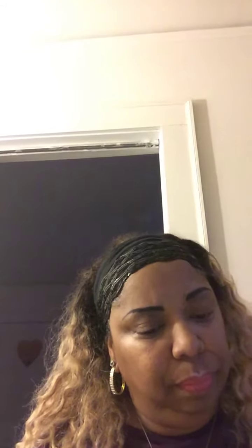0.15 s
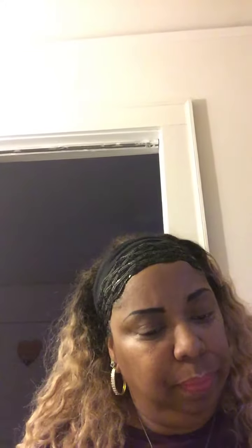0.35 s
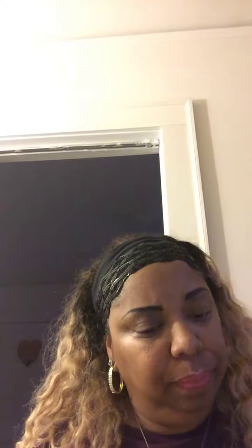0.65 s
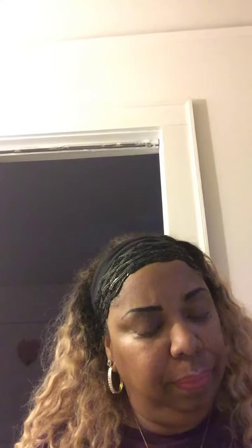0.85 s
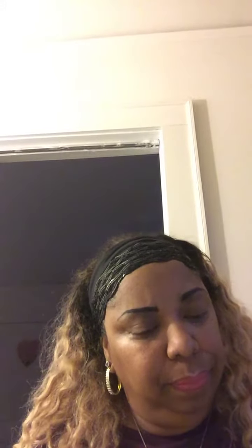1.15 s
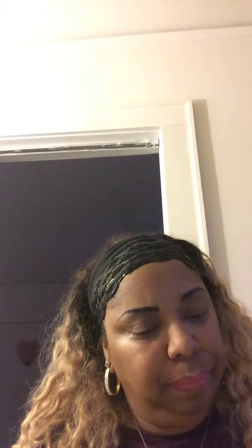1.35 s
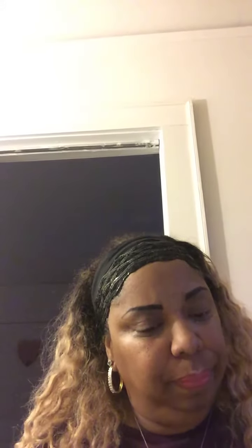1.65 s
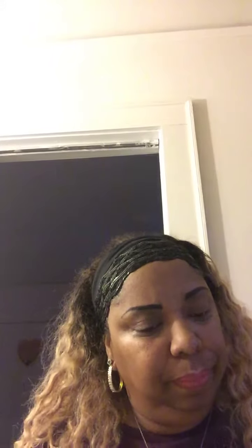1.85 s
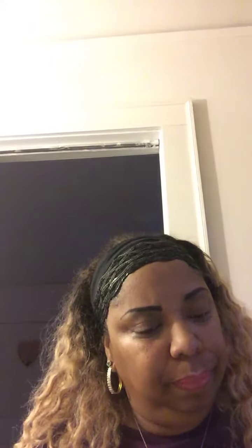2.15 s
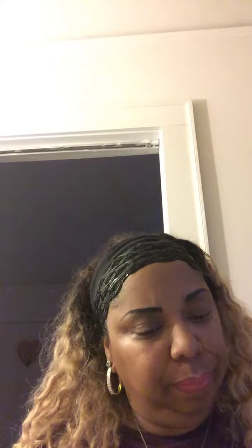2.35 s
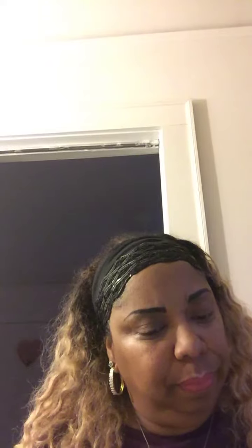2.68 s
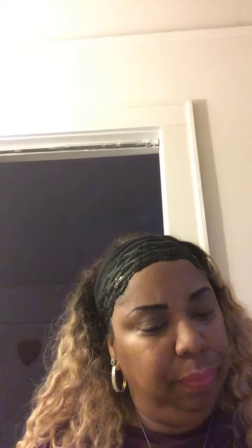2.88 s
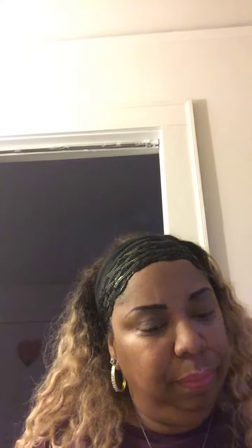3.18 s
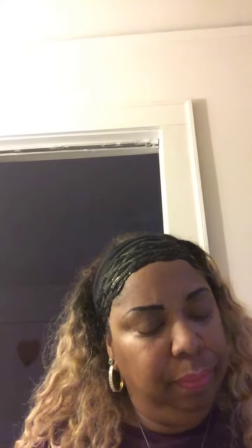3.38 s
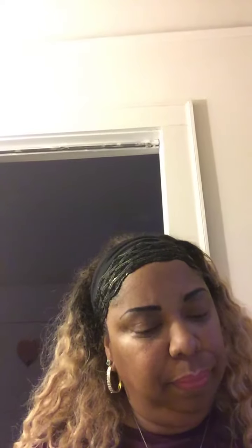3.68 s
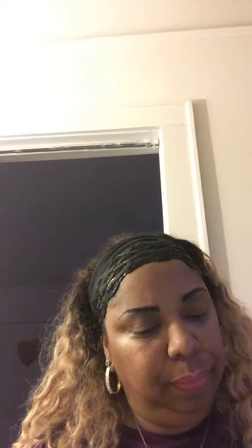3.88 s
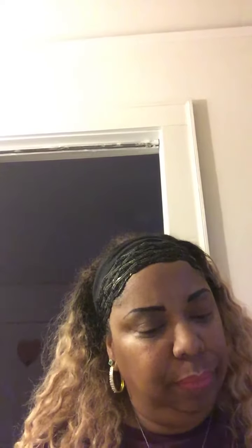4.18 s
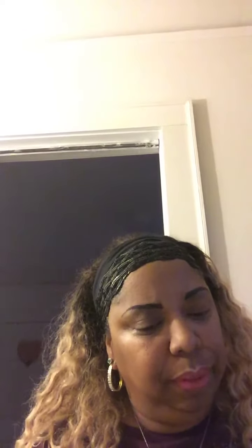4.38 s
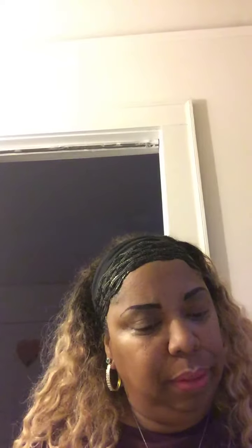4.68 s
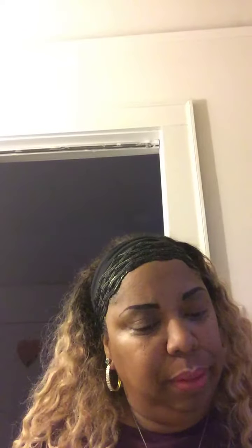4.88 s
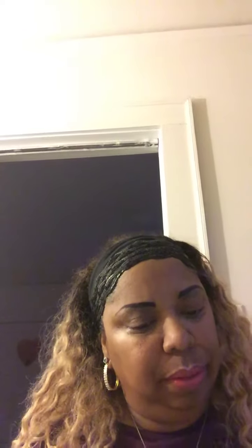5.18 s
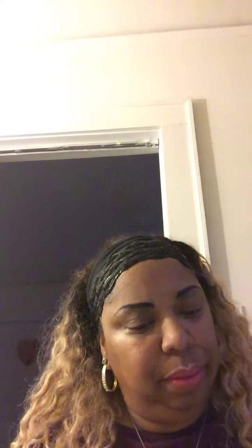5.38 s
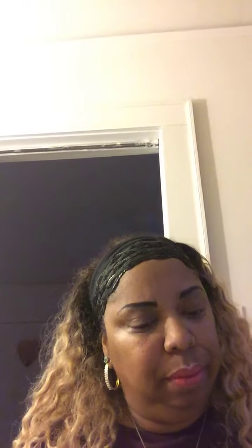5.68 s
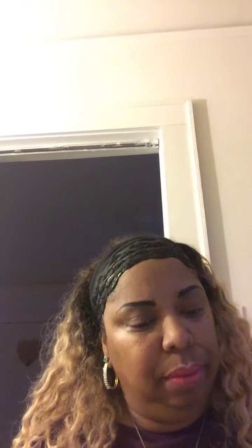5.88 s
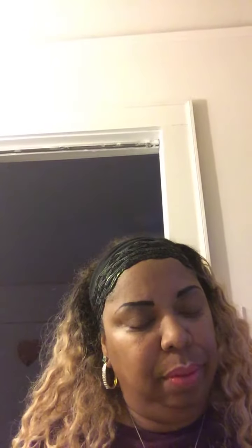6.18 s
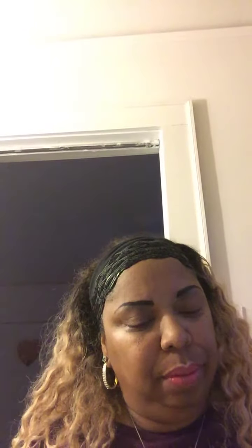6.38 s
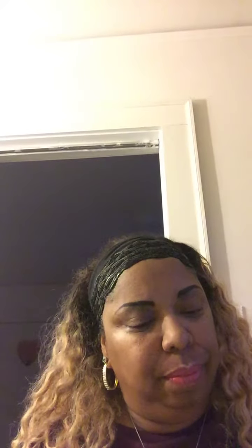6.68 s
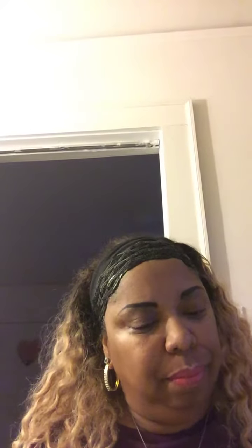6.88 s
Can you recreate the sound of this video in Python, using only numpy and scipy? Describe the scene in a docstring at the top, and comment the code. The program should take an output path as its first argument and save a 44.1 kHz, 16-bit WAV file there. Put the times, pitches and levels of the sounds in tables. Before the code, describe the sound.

Irregular bursts of dry paper rustling and creasing, separated by quiet gaps, with the busiest crackle near five seconds over low room hum.

```python
"""Creases snap and thin sheets swish at once, as pages are leafed through near a phone microphone.
Each swish is a smooth slide of noise under clumps of tiny ringing buckles; each snap is a sharp noise burst.
Now and then a bundle of pages lands with a soft thud, which rings the low modes of book and table.
The small quiet room answers the paper; room tone, a low hum and an appliance's rumble lie underneath."""
import sys
import numpy as np
from scipy import signal
from scipy.fft import rfft, irfft, next_fast_len
from scipy.io import wavfile

SR = 44100
rng = np.random.default_rng(int(sys.argv[2]) if len(sys.argv) > 2 else 0)


def digitize_waveform(pressure):
    """Quantize a signal to 16-bit integers and store it at the path in sys.argv[1].

    Rows of a 2-D input are taken as channels; values are limited to [-1, 1].
    """
    field = np.atleast_2d(pressure).T
    bounded = np.clip(field, -1, 1)
    quanta = np.round(bounded * 32767).astype(np.int16)
    wavfile.write(sys.argv[1], SR, quanta)


N = 310905


def swish():
    """Sliding paper buckles in clumps of tiny grains; each rings a few cycles, over a smooth slide."""
    # how strongly a sheet sounds at each pitch: pitch_hz [Hz], level_db [dB per Hz, relative]
    sheet_spectrum = [(210, -32), (350, -5), (1110, 3.5), (1910, 3.5), (3500, 0), (6230, -8), (10400, -23),
                      (12800, -28), (16000, -30)]
    grains_per_s, grain_spread_db, grain_cycles = 1500.0, 4.5, 3.46   # rate before clumping
    smooth_db, patchy_db = -5, 2
    catch_share = 0.25   # how far the loudness of the whole swish follows the clumps
    plain_body_db, plain_edge_db = -6, -12   # body and edge at which the sheet keeps its own spectrum

    clump = from_db(5.1 * drift(60.0) + 4.0 * drift(250.0))
    born = rng.random(N) < grains_per_s * clump / SR
    heights = from_db(grain_spread_db * np.minimum(rng.exponential(1, N), 4))
    sizes = born * heights * rng.choice([-1, 1], N)
    pitches = np.geomspace(340, 15000, 24)
    dealt = rng.integers(0, 24, N)   # which pitch each grain gets
    level_db, body_db, edge_db, *resonance_db = sliding(pitches)

    sheet_db = at_hz(sheet_spectrum, pitches) + 10 * np.log10(pitches)   # bands widen with pitch
    middle = (pitches > 2000) & (pitches < 6000)
    sheet_db -= 10 * np.log10(np.sum(from_db(2 * sheet_db)[middle]))   # middle bands sum to power 1

    slide = rng.standard_normal((2, N))
    out = 0
    for k, hz in enumerate(pitches):
        near = np.abs(dealt - k) <= 2   # a buckle excites neighbouring pitches together
        ringing = ring(sizes * near, hz, grain_cycles / hz + 0.0022)
        grains = band(ringing, hz / 1.122, hz * 1.171)
        smooth = band(slide[k % 2], hz / 1.093, hz * 1.114)
        mix = rms_one(rms_one(grains) + from_db(smooth_db) * rms_one(smooth))
        # body counts fully at 1300 Hz and below, edge fully some way above 12 kHz
        low = np.clip(np.log2(2600 / hz), 0, 1)
        high = np.clip(np.log2(hz / 3600) / 1.75, 0, 1)
        colour_db = sheet_db[k] + resonance_db[k]
        colour_db = colour_db + low * (body_db - plain_body_db) + high * (edge_db - plain_edge_db)
        out = out + from_db(colour_db + patchy_db * drift(31.0)) * mix
    return from_db(level_db) * clump ** catch_share * out


def sliding(pitches):
    """Each swish swells and fades evenly in dB; overlapping ones add, and the loudest sets the colour."""
    # sheets that slide: fastest_moment_s [s], peak_db [dB], swell_s [s], fade_s [s],
    # brightness_db [dB], resonance_hz [Hz], resonance_lift_db [dB]
    swish_list = [(0.04,-50.5,0.004,0.22,-11,3300,7.5), (0.101,-41,0.02,0.065,-14.5,3200,5),
                  (0.2342,-38.5,0.0027,0.045,-23,2220,0), (0.291,-48,0.053,0.14,-22,2780,6),
                  (0.314,-37,0.025,0.06,-7,4100,0), (0.495,-41.5,0.0059,0.014,-12.5,3030,11),
                  (0.533,-61.5,0.076,0.048,-39,1140,11.5), (0.899,-58.5,0.053,0.062,11,4680,7),
                  (1.008,-64.5,0.036,0.76,8.5,2750,1), (1.117,-52.5,0.066,0.079,6,2700,5.5),
                  (1.2,-53.5,0.12,0.032,4,2700,11), (1.262,-45.5,0.035,0.096,-0.5,3800,2.5),
                  (1.422,-50,0.025,0.1,-13,1670,9), (1.448,-42.5,0.018,0.062,-9.5,2580,0.5),
                  (2.122,-65.5,0.16,0.12,2.5,6490,3), (2.217,-47.5,0.025,0.061,10,7500,-1),
                  (2.292,-53.5,0.019,0.096,6.5,3080,9.5), (2.428,-49,0.073,0.073,-4.5,2730,8),
                  (2.643,-52,0.061,0.099,-1,2580,8), (2.686,-49,0.067,0.074,-28,2750,1),
                  (2.769,-55.5,0.057,0.019,-55,2050,5), (3.396,-60.5,0.033,0.065,17.5,6160,0),
                  (3.646,-53,0.081,0.52,7,3200,4.5), (3.798,-47.5,0.051,0.23,-1,2960,4),
                  (3.855,-35.5,0.0047,0.14,3.5,2700,4.5), (4.086,-40.5,0.15,0.072,-8.5,2700,3),
                  (4.839,-51,0.031,0.037,11.5,4180,7.5), (4.93,-66.5,0.68,0.35,9.5,7000,1.5),
                  (5.003,-48.5,0.029,0.042,11.5,4080,7), (5.057,-34.5,0.011,0.057,14.5,5800,7),
                  (5.096,-30.5,0.063,0.073,4,4120,5), (5.14,-43,0.047,0.12,-5,2360,3.5),
                  (5.2577,-47.5,0.0023,0.089,9,3980,14), (5.307,-42,0.086,0.14,2.5,3690,7),
                  (5.372,-42.5,0.003,0.064,-3,3750,5), (5.425,-39.5,0.0056,0.09,-12,2780,10),
                  (5.476,-35.5,0.09,0.075,0,4200,2), (5.534,-40,0.27,0.062,-2,5730,0),
                  (5.602,-56,0.23,0.061,-22,2090,7.5), (5.862,-58.5,0.054,0.1,-45,2360,10),
                  (6.21,-63.5,0.18,0.038,1,1030,10), (6.31,-56.5,0.035,0.094,0.5,5830,6),
                  (6.408,-62.5,0.0048,0.21,4.5,3970,11), (6.528,-43,0.041,0.074,7.5,6700,1),
                  (6.69,-68,0.47,0.31,7,2960,6), (6.74,-46.5,0.026,0.064,-18,3000,4.5),
                  (6.861,-49,0.006,0.076,-4.5,3000,-12), (6.92,-46.5,0.062,0.051,-18,2320,7)]
    swell_depth_db = 30   # rise or fall within one swell or fade time
    fade_dulls, swell_dulls = 0.18, 0.059   # edge lost per dB of fade or swell: it comes late, goes early
    resonance_octaves, sag_octaves = 0.2, 0.18   # resonance width, and how far it sinks over the fade

    s, peak_db, swell_s, fade_s, bright_db, hz, lift_db = np.transpose(swish_list)[:, :, None]
    t = np.arange(0, N + 64, 64) / SR
    fade_db = swell_depth_db * np.maximum(t - s, 0) / np.maximum(fade_s, 0.004)
    swell_db = swell_depth_db * np.maximum(s - t, 0) / np.maximum(swell_s, 0.002)
    power = from_db(2 * np.maximum(peak_db - fade_db - swell_db, -150))
    total_db = 10 * np.log10(power.sum(axis=0))
    share = power / power.sum(axis=0)

    dulling_db = np.minimum(fade_dulls * fade_db + swell_dulls * swell_db, 30)
    edge_db = np.sum(share * (bright_db - dulling_db), axis=0)
    body_db = -12.5 - 0.3 * np.sum(share * bright_db, axis=0)   # bright slides have little body
    sag = sag_octaves * np.minimum(fade_db / swell_depth_db, 1)
    octave = np.sum(share * (np.log2(hz) - sag), axis=0)
    lift_db = np.sum(share * lift_db, axis=0)
    resonance_db = []
    for pitch in pitches:
        distance = (np.log2(pitch) - octave) / resonance_octaves
        resonance_db.append(lift_db * np.exp(-0.5 * distance ** 2))
    return in_time(np.transpose([t, total_db, body_db, edge_db, *resonance_db]))


def snaps():
    """A crease flips: a sharp burst, coloured by the size of the fold, then a short shiver."""
    # creases that snap: start_s [s], peak_db [dB], pitch_hz [Hz], edge_db [dB, the 6-13 kHz part]
    snap_list = [(0.0221, -42, 1310, -17), (0.0361, -31, 2960, -19), (0.04, -26.5, 3900, -23),
                 (0.069, -40, 2660, -25), (0.1027, -48, 2300, -12), (0.1056, -26.5, 3160, -4),
                 (0.122, -36, 2310, 5), (0.161, -45, 2800, -28), (0.179, -44, 3330, -21),
                 (0.2352, -30, 2110, -16), (0.2385, -34, 3700, -21), (0.2584, -42, 2080, -4),
                 (0.296, -35, 1910, -18), (0.312, -28, 3940, -4), (0.4945, -32.5, 2480, -12),
                 (0.526, -44.5, 1510, -34), (0.658, -45, 1700, -10), (0.6681, -39.5, 1380, -15),
                 (0.891, -32.5, 6200, 6), (0.903, -33.5, 7900, -15), (0.9095, -32, 6100, 7),
                 (0.9158, -39, 6140, 3), (1.002, -39, 7400, -35), (1.008, -47, 7300, -20),
                 (1.069, -36, 7000, -11), (1.111, -54, 2060, -13), (1.1185, -30, 2960, -2),
                 (1.14, -37, 3500, -18), (1.1711, -25.5, 7200, -13), (1.1942, -31.5, 2660, 2),
                 (1.244, -40.5, 3360, -17), (1.25, -36, 4430, 1), (1.256, -39, 5000, -20),
                 (1.2694, -27, 2970, 0), (1.2836, -25, 9900, 7), (1.953, -42.5, 11500, -1),
                 (2.1172, -38, 4100, -1), (2.204, -48, 1600, -15), (2.252, -39, 7240, -20),
                 (2.2903, -27.5, 6900, 3), (2.2958, -33.5, 5460, -20), (2.314, -40, 6130, -19),
                 (2.326, -37, 6630, -36), (2.358, -43, 5000, 2), (2.4268, -33.5, 3830, -7.5),
                 (2.447, -42, 4170, -21), (2.506, -41.5, 3660, -10), (2.6351, -36.5, 2470, -14),
                 (2.686, -37, 1460, -14), (3.3972, -30, 7500, -23), (3.6078, -46, 3420, -15),
                 (3.6199, -32.5, 4970, -8), (3.638, -21, 6730, -21), (3.655, -43, 7060, -13),
                 (3.689, -53, 2600, -12), (3.698, -48.5, 1650, -42), (3.712, -23, 9500, 5),
                 (3.7563, -36.5, 3370, -30), (3.79, -44, 2420, -20), (3.808, -34, 3100, -16),
                 (3.8138, -20, 6700, -25), (3.845, -41, 2750, -4), (3.8568, -22.5, 4450, -3),
                 (3.8686, -12.5, 4230, 6.5), (3.8802, -14.5, 3060, -3), (4.041, -41, 2300, -12),
                 (4.0455, -49, 2500, -15), (4.08, -28, 2600, -19), (4.423, -47, 7200, -13),
                 (4.4455, -48, 11500, -6), (4.673, -51.5, 4800, -45), (4.69, -36.5, 12400, -14),
                 (4.84, -43, 4570, -40), (4.865, -39, 4330, -1), (4.888, -41, 4460, -14),
                 (4.946, -46, 5500, -24), (4.9533, -39.5, 5760, -2), (4.987, -44, 3000, -7),
                 (5.0049, -24, 6700, -10), (5.057, -21, 6160, 6), (5.0615, -22, 6300, -10),
                 (5.065, -14, 5800, -4), (5.0695, -24.5, 3050, -18), (5.084, -14, 6360, -8),
                 (5.095, -21, 4360, -5), (5.0965, -21.5, 4260, -18), (5.0995, -16.5, 4300, 2),
                 (5.1007, -17.5, 5740, -6), (5.1273, -23.5, 4300, -11), (5.2141, -32.5, 4600, -25),
                 (5.23, -41, 3130, -17), (5.259, -20, 2660, -1), (5.3134, -34, 2870, -40),
                 (5.324, -32.5, 4100, -45), (5.338, -34.5, 2380, -37), (5.3711, -24, 7250, -3),
                 (5.411, -38, 3800, -28), (5.4593, -41, 6290, -9), (5.471, -26, 4120, -24),
                 (5.4768, -21.5, 3960, -28), (5.4845, -35, 4000, -17), (5.533, -30, 6670, -36),
                 (5.637, -45.5, 2210, -40), (5.839, -47, 2160, -35), (5.856, -44, 2850, -46),
                 (5.867, -41, 2000, -30), (5.881, -49, 2550, -34), (6.214, -38, 7300, -29),
                 (6.297, -38, 5500, -9), (6.324, -56, 3040, -13), (6.34, -44, 7900, -18),
                 (6.406, -39.5, 7900, -31), (6.517, -20.5, 8200, -17), (6.522, -38, 3830, -21),
                 (6.5332, -29, 7000, -8), (6.5338, -28, 3040, 1), (6.538, -39, 2980, -3),
                 (6.559, -31.5, 3700, -9), (6.684, -43, 3300, -17), (6.7266, -34, 3000, -11),
                 (6.7347, -30.5, 6440, -4), (6.745, -31, 3520, -29.5), (6.855, -45, 3190, -20),
                 (6.861, -34, 3500, -5), (6.9231, -35, 2100, -19)]
    snap_t60_s, shiver_db, shiver_t60_s = 0.0068, -27, 0.0091
    dull_edge_db = -20   # creases with less edge than this are soft: they ring longer and click less

    length = 4096
    t = np.arange(length) / SR
    out = np.zeros(N + length)
    noise = rng.standard_normal((len(snap_list), length))
    # one tall sample is the clean first flip; the crackle follows
    noise[:, 6] = 2 * from_db(7) * np.sign(noise[:, 6])
    decay = from_db(-60 * t / snap_t60_s) + from_db(shiver_db - 60 * t / shiver_t60_s)
    shape = np.minimum(t / 0.00008, 1) * decay

    for (start_s, peak_db, hz, edge_db), white in zip(snap_list, noise):
        burst = white * shape
        soft_db = max(dull_edge_db - edge_db, 0)
        # large, low folds have more body
        body_db = -13 - 1.5 * np.log2(hz / 2870)
        broad = band(band(burst, hz / 2.0, hz * 1.84), hz / 2.0, hz * 1.84)
        fold = ring(broad, hz, (9 + 1.2 * soft_db) / hz)   # the freed fold rings a few cycles
        body = band(band(burst, 700, 4900), 700, 4900)
        edge = band(burst, 6000, 13000)
        parts = [(-4.5, fold), (1.5 - 0.5 * soft_db, broad), (body_db, body), (edge_db, edge)]
        click = 0
        for level_db, part in parts:
            click = click + from_db(level_db) * part / np.abs(part).max()
        at = round(start_s * SR)
        out[at:at + length] += from_db(peak_db) * click / np.abs(click).max()
    return out[:N]


def thuds():
    """A soft, uneven contact rings the low modes of book and table; the lowest set in last."""
    # bundles that land: start_s [s], peak_db [dB], upper_modes_db [dB], contact_s [s], tilt_db [dB per mode]
    thud_list = [(0.664, -32.5, -7, 0.025, 2.1), (1.834, -37, -10, 0.045, -2.3),
                 (3.029, -40, -2, 0.077, -2.5), (4.05, -39.5, -1, 0.003, 6), (4.474, -36, -15, 0.05, 0.5),
                 (5.19, -47, -11, 0.0087, 0.5), (5.873, -43, 0.5, 0.0067, -0.8)]
    # modes of book and table: pitch_hz [Hz], level_db [dB, before each thud's balance], t60_s [s]
    table_modes = [(92.5, 6, 0.16), (150.7, 5, 0.32), (193.4, 7, 0.085), (258, 0, 0.043),
                   (396, -6.5, 0.067)]
    lag_cycles = 0.8   # each mode takes up the push this many of its cycles late

    length = 8192
    t = np.arange(length) / SR
    out = np.zeros(N)
    noise = rng.standard_normal((len(thud_list), len(table_modes), length))
    for (start_s, peak_db, upper_db, contact_s, tilt_db), pushes in zip(thud_list, noise):
        hit = 0
        for k, ((hz, mode_db, t60_s), push) in enumerate(zip(table_modes, pushes)):
            progress = np.clip((t - lag_cycles / hz) / contact_s, 0, 1)
            contact = push * np.sin(np.pi * np.sqrt(progress))   # quick rise, slower release
            level_db = mode_db + upper_db * (k > 0) + tilt_db * k
            hit = hit + from_db(level_db) * rms_one(ring(contact, hz, t60_s))
        at = round(start_s * SR)
        out[at:at + length] += from_db(peak_db) * hit / np.abs(hit).max()
    return out


def room(x):
    """Sound goes round eight feedback delays, and grows duller on every round."""
    room_t60_s, wall_cut_hz = 0.45, 2600
    lags_s = np.array([0.0113, 0.0137, 0.0161, 0.0189, 0.0217, 0.0251, 0.0283, 0.0317])
    size = next_fast_len(N + SR)
    w = 2 * np.pi * np.arange(size // 2 + 1) / size
    dull = 1 / (1 + 1j * w * SR / (2 * np.pi * wall_cut_hz))
    response = 0
    for k, lag_s in enumerate(lags_s):
        loop = from_db(-60 * lag_s / room_t60_s) * dull * np.exp(-1j * w * lag_s * SR)
        response = response + (-1) ** k * loop / (1 - loop)
    return irfft(rfft(x, size) * response, size)[:N]


def house():
    """Broad room tone whose bass wavers, a hum, and the rumble of an appliance with two upper tones."""
    # colour of the room tone: pitch_hz [Hz], level_db [dB per Hz, relative]
    room_spectrum = [(18, -46.5), (30, -25), (70, -5), (176, -0.5), (242, -5.5), (455, -17.5), (562, -14.5),
                     (1150, -18), (3210, -28), (3660, -26), (4900, -31.5), (6380, -28.5), (10300, -36),
                     (14500, -35.5), (16500, -64)]
    # how the levels move: time_s [s], room_tone_db [dB], hum_db [dB], rumble_db [dB]
    house_levels = [(0, -63, -67.5, -108), (2.2, -63, -57, -73), (2.5, -62, -63.5, -61.5),
                    (2.9, -62.5, -66, -63.5), (4.2, -62.5, -103, -64.5), (5.5, -63, -81.5, -65),
                    (7.05, -61, -97, -65)]
    # appliance tones: pitch_hz [Hz], level_db [dB, relative to the rumble]
    rumble_tones = [(56, -4), (212, -2.5), (253, -7)]

    tone_db, hum_db, rumble_db = in_time(house_levels)
    white = rng.standard_normal((2, N))
    bass = from_db(3 * drift(5.1)) * band(coloured(room_spectrum), 45, 299)
    tone = above(coloured(room_spectrum), 306) + bass
    hum = from_db(0.11 * drift(5.7)) * rms_one(ring(white[0], 133.7, 0.25))
    rumble = 0
    for hz, level_db in rumble_tones:
        rumble = rumble + from_db(level_db) * rms_one(ring(white[1], hz, 0.15))
    return from_db(tone_db) * tone + from_db(hum_db) * hum + from_db(rumble_db) * rumble


def ring(clicks, hz, t60_s):
    """A damped resonator: a unit click sets a sine ringing that falls 60 dB in t60_s."""
    r = from_db(-60 / (t60_s * SR))
    w = 2 * np.pi * hz / SR
    return signal.lfilter([0, np.sin(w)], [1, -2 * r * np.cos(w), r * r], clicks + 1e-18)


def drift(rate_hz):
    """Slow random wandering of spread 1: low-passed noise, made at every 20th sample and joined up."""
    r = np.exp(-2 * np.pi * rate_hz * 20 / SR)
    white = rng.standard_normal(N // 20 + 2002)
    slow = signal.lfilter([1], [1, -2 * r, r * r], white)[2000:]   # skip the start-up
    return np.interp(np.arange(N) / 20, np.arange(len(slow)), rms_one(slow))


def coloured(spectrum):
    """Steady noise of the given spectrum, at rms 1."""
    hz = np.maximum(np.arange(N // 2 + 1) * SR / N, 1)
    return rms_one(irfft(rfft(rng.standard_normal(N)) * from_db(at_hz(spectrum, hz)), N))


def band(x, low_hz, high_hz):
    """Gentle band-pass: keeps what lies between two pitches."""
    edges_hz = [low_hz, min(high_hz, 0.45 * SR)]
    return signal.sosfilt(signal.butter(2, edges_hz, "band", fs=SR, output="sos"), x)


def above(x, hz):
    """Steep high-pass: keeps what lies above a pitch."""
    return signal.sosfilt(signal.butter(4, hz, "high", fs=SR, output="sos"), x)


def from_db(db):
    """Gain of a level in dB."""
    return 10 ** (np.asarray(db) / 20)


def rms_one(x):
    """The signal scaled to rms 1."""
    return x / np.sqrt(np.mean(x ** 2) + 1e-20)


def in_time(rows):
    """Table columns after the time column, joined by straight lines at every sample."""
    s, *columns = np.transpose(rows)
    return [np.interp(np.arange(N) / SR, s, column) for column in columns]


def at_hz(points, hz):
    """Level of a spectrum at given pitches, by straight lines on log frequency."""
    point_hz, point_db = np.transpose(points)
    return np.interp(np.log(hz), np.log(point_hz), point_db)


def scene():
    """Small sheets radiate no bass; only the paper wakes the room."""
    paper = above(swish() + snaps(), 250)
    echo = from_db(-19) * room(paper)
    table = above(thuds(), 65)
    return (paper + echo + table + house())[None]


def record(dry):
    """The microphone port has a dip in the treble; deep bass and the top are cut steeply."""
    dip_hz, dip_width_hz, dip_depth = 10420, 310, 0.8   # depth: share of the peak taken away
    b, a = signal.iirpeak(dip_hz, dip_hz / dip_width_hz, fs=SR)
    port = dry - dip_depth * signal.lfilter(b, a, dry)
    top_cut = signal.cheby2(12, 60, 16400, fs=SR, output="sos")   # 60 dB down from 16400 Hz up
    return signal.sosfilt(top_cut, above(port, 49))


dry = scene()
out = record(dry)
digitize_waveform(out)
```